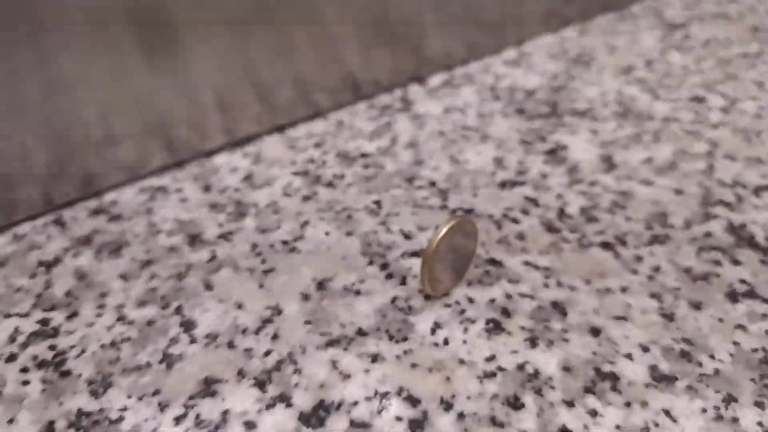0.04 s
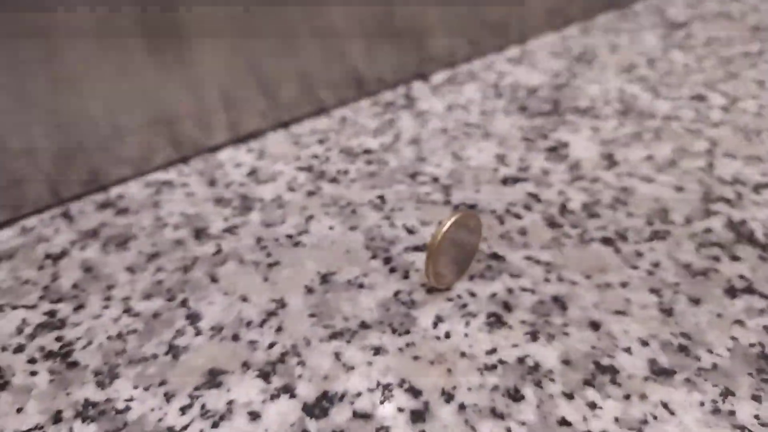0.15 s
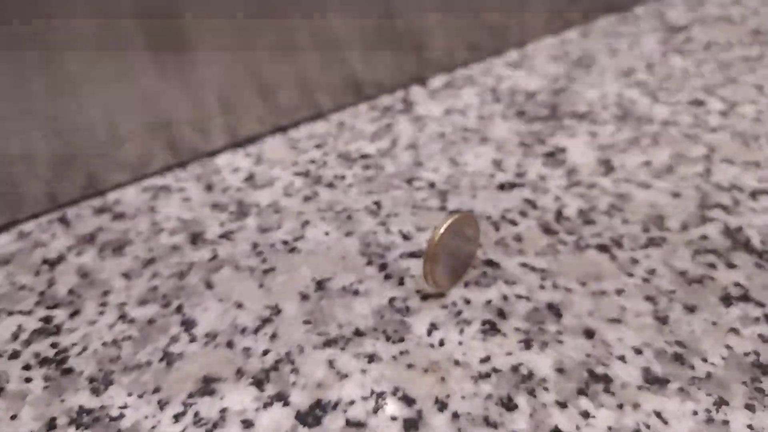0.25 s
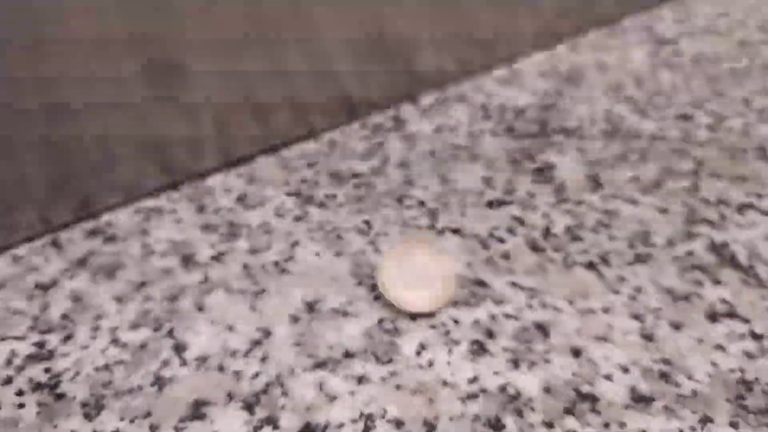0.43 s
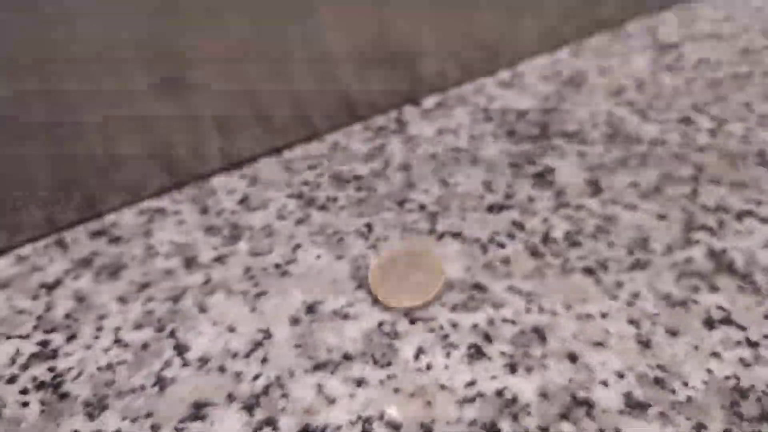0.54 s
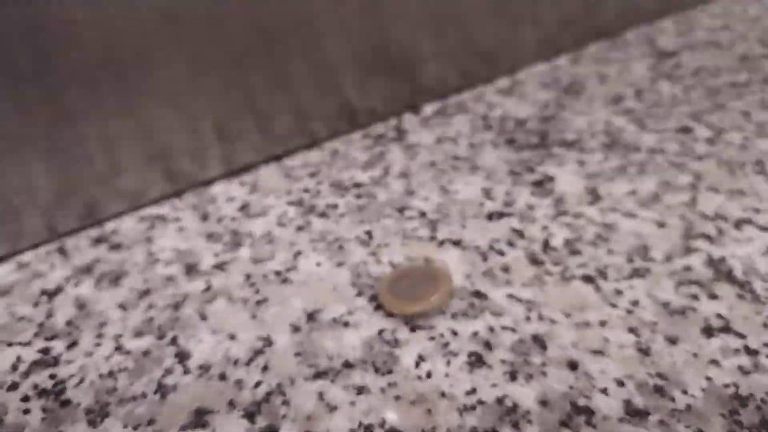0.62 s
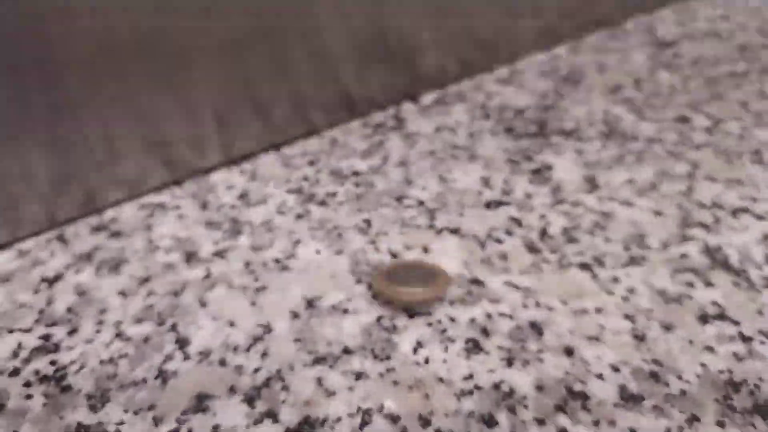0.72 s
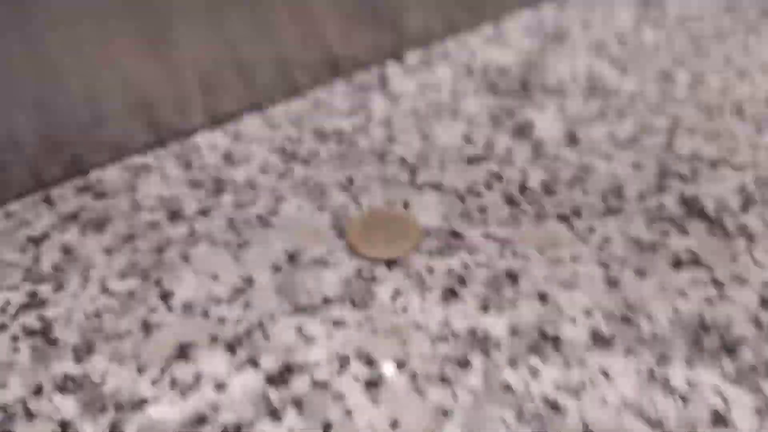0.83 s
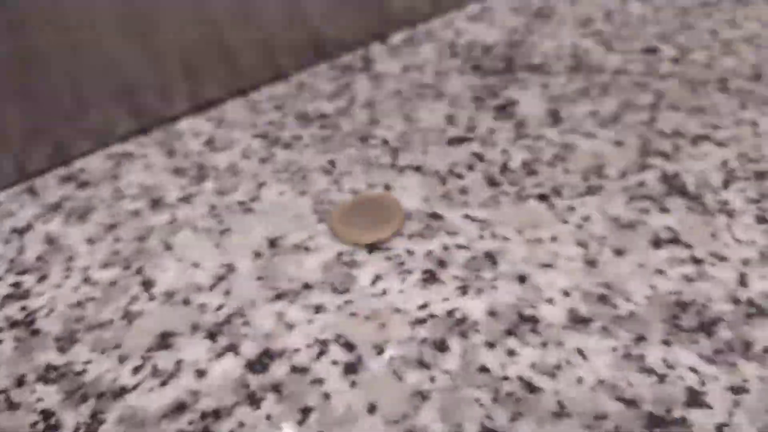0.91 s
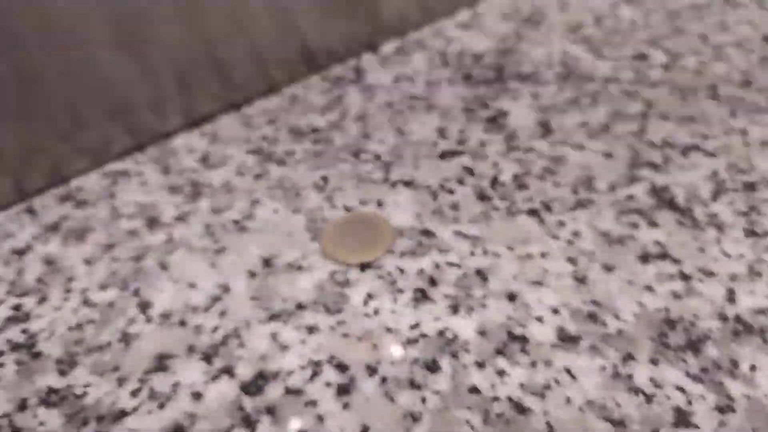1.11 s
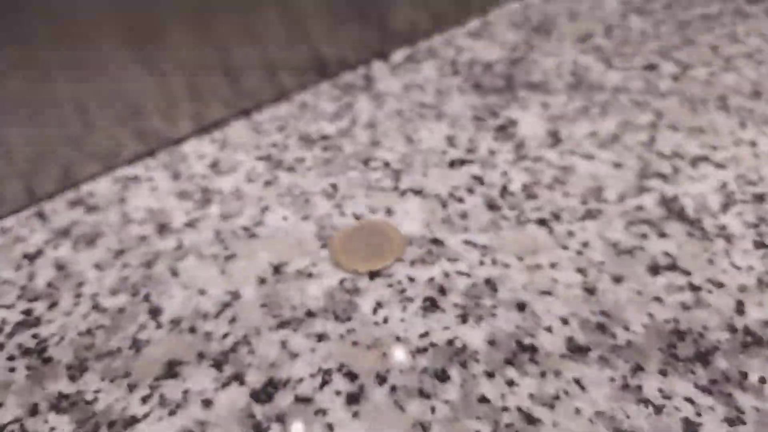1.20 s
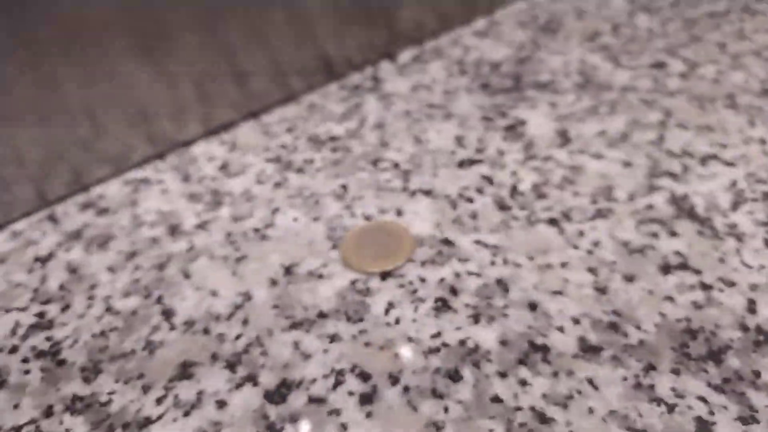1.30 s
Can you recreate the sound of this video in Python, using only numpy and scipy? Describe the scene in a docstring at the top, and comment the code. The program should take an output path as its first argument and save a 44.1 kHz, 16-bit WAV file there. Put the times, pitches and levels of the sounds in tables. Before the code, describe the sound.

Close by, a coin rattles down onto a stone counter with bright, ringing clinks that speed up and stop. Starting slightly earlier, a distant door bumps and shuts, then knocks twice more, booming through the room over a low rumble.

```python
"""A coin tips over on a stone counter, close to a stereo microphone: its rim clinks and scrapes
round in quickening turns, the metal rings, and it shudders to rest. Further off in the echoing
room, starting just ahead of the coin, something heavy, probably a door, pushes air, bumps, rasps
its latch and bangs shut; two lighter knocks follow. Each knock sets door and hall booming.
A low rumble and a faint hum lie under it all."""
import sys
import numpy as np
from scipy import signal
from scipy.fft import rfft, irfft
from scipy.io import wavfile
from scipy.ndimage import uniform_filter1d

SR = 44100
rng = np.random.default_rng(int(sys.argv[2]) if len(sys.argv) > 2 else 0)


def master(y):
    """Save y as 16-bit WAV."""
    cut = np.clip(np.atleast_2d(y).T, -1, 1)
    pcm = np.round(cut * 32767)  # scale
    wavfile.write(sys.argv[1], SR, pcm.astype(np.int16))


N = 59535
T, HZ = np.arange(N) / SR, np.fft.rfftfreq(N, 1 / SR)

# the hall's sound at the microphone (frequency [Hz], left-right correlation [-1 to 1])
HALL_CORRELATION = [(40, .98), (150, 0.85), (330, 0.73), (700, 0.053), (1400, -0.19), (3000, 0.21),
                    (16000, -0.15)]
# its balance (frequency [Hz], left over right [dB])
HALL_PAN = [(40, -3), (160, 1), (300, -1), (600, 0.5), (2000, 2.4), (5000, -1), (9000, -0.5), (14000, 3)]
# its decay (frequency [Hz], time to fall 60 dB [s])
HALL_T60 = [(40, 4.1), (160, 2.32), (400, 1.39), (1000, 1), (2000, 1.08), (5000, 0.83), (9000, 0.83),
            (15000, 1.14)]
# its build-up (frequency [Hz], time constant [s])
HALL_RISE = [(40, .03), (170, 0.034), (400, 0.006), (900, 0.0026), (1800, 0.0011), (9000, 0.00037)]
# spectra of room tone and pushed air (frequency [Hz], relative level [dB])
ROOM_TONE_COLOUR = [(5, -37), (25, 14), (60, 7.5), (170, -19), (280, -6.5), (1000, -23), (3000, -30.5),
                    (6000, -35), (9000, -27.5), (12000, -42), (16000, -42)]
DRAUGHT_COLOUR = [(8, -6.5), (30, 5.5), (60, -22), (90, -5.5), (150, -30), (500, -60)]
# swell of the air pushed by the door (time [s], level [dB])
DRAUGHT_SWELL = [(0, -46), (.12, -49), (.24, -29.5), (.33, -39), (.42, -51), (.55, -34), (.7, -51),
                 (1.35, -50)]
# far door knocks (time [s], gain [dB], bass below 200 Hz [dB], treble at 1.5 kHz [dB],
# crack gain [dB], decay time [factor])
DOOR_KNOCKS = [(0.084, -32, 1.5, -73, -30, 1), (.204, -17, 5, -26.5, -26, 0.43),
               (.232, -9, 1.5, -27, -25, 0.54), (.333, -2.5, -3, -1.5, 0.5, 0.98),
               (.378, -5, 2.5, -6, -18, 0.62), (0.446, -11, 3.5, -2, 0, 0.31), (.53, -17, -11, 0, -5, 0.77),
               (.892, -15, -8, -3.5, -3.5, 0.63), (1.053, -19, -6.5, -4, -4, 0.47)]
# spectra of a knock's reverberation, its crack and the latch as heard through the microphone
# (frequency [Hz], relative level [dB])
DOOR_COLOUR = [(8, -37), (28, -10), (58, -19.5), (90, -11), (170, 1.5), (250, 1), (400, -6), (650, -4.5),
               (1200, -12.5), (1900, -12.5), (3000, -18.5), (6000, -23), (8600, -17.5), (11000, -32),
               (14500, -44.5), (16000, -95)]
CRACK_COLOUR = [(200, -16.5), (850, -7.5), (1400, 21), (2000, 40), (2600, -14), (4000, -16), (8600, 25.5),
                (12000, -31), (16000, -50.5)]
LATCH_COLOUR = [(500, 5), (1800, -8.5), (5500, -20), (8000, -6), (9800, -3), (11000, -14), (12300, -12),
                (14500, -29), (16000, -55)]
# modes of door and hall, a list each (pitch [Hz], relative level [dB], base time to fall 60 dB [s])
BOOM_HZ = [88, 160, 210, 250, 306, 370, 554, 661, 713, 820, 1814, 2053]
BOOM_DB = [-24.5, -17, -21.5, -19.5, -29, -31.5, -26, -22, -29, -23.5, -38.5, -48]
BOOM_T60 = [3.3, 2.37, 2.5, 2.46, 3.1, 1.62, 1.55, 1.41, 1.05, 0.79, 1.4, 1.9]
# close rim strikes (time [s], gain [dB], chatter length [s], chatter gain [dB],
# left over right [dB], ring gain [dB], stone knock gain [dB])
RIM_STRIKES = [(0.5489, 2.5, .0014, 7, -2, -5, -7), (0.6397, 0.5, 0.0045, 9, -3.5, -8, -10),
               (0.7206, 1.5, 0.0062, 13, -8.5, -3, -6.5), (0.7923, -0.5, 0.0049, 18, -5.5, -10, -14),
               (0.858, -1, 0.0072, 12, -8, -1.5, -12), (0.9676, -6, .0062, 5, -6.5, -12, -13),
               (1.014, -10.5, 0.0067, 2, -9, -1, -25), (1.0495, -5.5, 0.0059, 6, -5.5, -2.5, -16),
               (1.081, -12.5, 0.0034, 33, -13, -14, -18), (1.1, -19, .003, 14, -1, -17, -25)]
# spectra of the rim's tick and the counter's knock as heard through the microphone,
# the tick bright near 9 kHz (frequency [Hz], relative level [dB])
TICK_AT_MIC = [(300, -32), (1300, -20), (3000, -21), (6000, -12.5), (7600, -4), (8900, 4.5), (9600, 4.5),
               (10600, -8.5), (12500, -39), (13400, -13), (14100, -4.5), (14600, -9), (15400, -13),
               (16000, -37), (16800, -44)]
STONE_AT_MIC = [(150, 13), (700, 5), (1400, 8.5), (2500, 3), (4500, -5), (7000, 3.5), (12000, -27)]
# the coin's modes, a list each
# (pitch [Hz], relative level [dB], time to fall 60 dB [s], waver [share of pitch])
COIN_HZ = [8662, 8882, 9211, 9415, 9539, 13980, 14130]
COIN_DB = [-44, -43, -49, -43, -49, -31, -34]
COIN_T60 = [.25, .35, .25, .35, .3, .17, .16]
COIN_WAVER = [.001, .0005, .0008, .0005, .0006, .0015, .0025]
# scrape of the rolling rim (time [s], relative level [dB])
SCRAPE_SWELL = [(.54, -56), (.57, -43), (.68, -44), (.75, -38), (0.828, -62), (0.922, -30), (.99, -60),
                (1.091, -35.5), (1.13, -51), (1.192, -56)]
# reverberation round the counter (frequency [Hz], time to fall 60 dB [s])
COIN_ROOM_T60 = [(500, 0.31), (4000, 0.37), (9000, 0.35), (15000, 0.18)]
# added balance of the whole coin sound (frequency [Hz], left over right [dB])
COIN_PAN = [(6000, 3.5), (9000, 1), (11500, -1), (14000, 10)]


def amp(db):
    """Decibels to gain."""
    return 10 ** (np.asarray(db) / 20)


def unit(x):
    """Scales to rms 1."""
    return x / np.sqrt(np.mean(x ** 2) + 1e-20)


def read(points, hz):
    """Reads a table on a log-frequency axis."""
    frequencies, values = np.transpose(points)
    return np.interp(np.log(hz + 1), np.log(frequencies + 1), values)


def pan(db):
    """Left and right gains for a level difference."""
    return amp(np.array([db, -db]).reshape(2, -1) / 2)


def add(mix, start_s, sound):
    """Mixes a sound in at the given time."""
    part = mix[:, round(start_s * SR):][:, :sound.shape[-1]]
    part += sound[..., :part.shape[1]]


def convolve(x, response):
    """Plays sound through a response, channel by channel."""
    return signal.fftconvolve(np.atleast_2d(x), np.atleast_2d(response), axes=1)[:, :N]


def click(colour):
    """Minimum-phase click of energy 1 with the given spectrum."""
    log_gain = np.log(amp(read(colour, abs(np.fft.fftfreq(2048, 1 / SR)))))
    pulse = np.fft.ifft(np.exp(np.conj(signal.hilbert(log_gain)))).real
    return pulse / np.linalg.norm(pulse)


def diffuse(colour):
    """Noise reaching the microphone from all round, alike on both sides only in the bass."""
    left, unrelated = rfft(rng.standard_normal((2, N)))
    correlation = read(HALL_CORRELATION, HZ)
    right = correlation * left + np.sqrt(1 - correlation ** 2) * unrelated
    gains = amp(read(colour, HZ)) * pan(read(HALL_PAN, HZ))
    return unit(irfft(np.array([left, right]) * gains, N))


def die_away(noise, t60, rise, bands=16):
    """Reverberation: each band builds up and dies at its own speed."""
    centres, spectrum = np.geomspace(30, 16000, bands), rfft(noise)
    out = np.zeros_like(noise)
    for hz, weights in zip(centres, np.eye(bands)):
        band = irfft(spectrum * read(list(zip(centres, weights)), HZ), N)
        out += band * amp(-60 * T / read(t60, hz)) * (1 - np.exp(-T / read(rise, hz)))
    return out


def wavering(hz, depth, drift_s):
    """Phase of a tone whose pitch strays by the share depth, changing over drift_s."""
    stray = unit(uniform_filter1d(rng.standard_normal(N), round(drift_s * SR)))
    return 2 * np.pi * (np.cumsum(hz * (1 + depth * stray)) / SR + rng.random())


def room_tone(hum_hz=154.3):
    """Low rumble all round the microphone and a faint hum in the centre."""
    return amp(-47.5) * diffuse(ROOM_TONE_COLOUR) + amp(-47) * np.sin(2 * np.pi * hum_hz * T)


def draught():
    """A low rumble of air swells as the door swings and shuts."""
    return diffuse(DRAUGHT_COLOUR) * amp(np.interp(T, *np.transpose(DRAUGHT_SWELL)))


def boom(decay_factor, rise_s=0.035):
    """Resonances of door and hall build up after a knock and ring on as dying sines."""
    modes = sum(amp(db - 60 * T / (t60 * decay_factor)) * np.sin(2 * np.pi * (hz * T + rng.random()))
                for hz, db, t60 in zip(BOOM_HZ, BOOM_DB, BOOM_T60))
    return modes * (1 - np.exp(-T / rise_s))


def door(crack_rise_s=0.00064, crack_decay_s=0.0069):
    """Knocks from across the hall: a short crack, then the room fills, the bass last, and booms on."""
    out = np.zeros((2, N))
    crack_envelope = np.exp(-T / crack_decay_s) * (1 - np.exp(-T / crack_rise_s))
    for start_s, db, bass_db, treble_db, crack_db, decay_factor in DOOR_KNOCKS:
        decay = [(hz, t60 * decay_factor) for hz, t60 in HALL_T60]
        wash = amp(-8.5) * die_away(diffuse(DOOR_COLOUR), decay, HALL_RISE)
        crack = amp(crack_db - 6) * diffuse(CRACK_COLOUR) * crack_envelope
        knock = wash + crack + boom(decay_factor)
        tone = [(200, bass_db), (330, 0), (500, 0.037), (1500, treble_db), (6000, 1.19 * treble_db)]
        add(out, start_s, amp(db) * irfft(rfft(knock) * amp(read(tone, HZ)), N))
    return out


def latch(rasp_start_s=.256, squeak_start_s=.277, shut_s=.335, fade_s=0.0027):
    """The far latch rasps over its plate with a thin squeak until the door shuts."""
    def held(start_s):
        return np.clip((T - start_s) / fade_s, 0, 1) * np.exp(-np.maximum(T - shut_s, 0) / fade_s)
    phase = wavering(hz=9775, depth=.001, drift_s=.005)
    squeak = amp(-38.5) * pan(-2) * np.sin([phase, phase - 1.8])  # the right side lags
    rasp = amp(-37.5) * diffuse(LATCH_COLOUR)
    return rasp * held(rasp_start_s) + squeak * held(squeak_start_s)


def rim_scrape(grains_per_s=1200):
    """The rolling rim ticks over the grain of the stone, close to the microphone."""
    grains = rng.choice([-1, 1], N) * (rng.random(N) < grains_per_s / SR)
    strengths = amp(-3 * np.minimum(rng.exponential(1, N), 3))
    times, levels_db = np.transpose(SCRAPE_SWELL)
    swell = amp(np.interp(T, times, levels_db)) * (T > times[0]) * (T < times[-1])
    return pan(-2.5) * convolve(unit(grains * strengths) * swell, click(TICK_AT_MIC))


def rim_chatter(length_s, db, touches_per_s=7000, skew=0.77):
    """One impact of rim on stone, then a brief flurry of touches."""
    touches = rng.standard_normal(N) * (rng.random(N) < touches_per_s / SR)
    touches *= (T < length_s) * np.sin(np.pi * np.minimum(T / length_s, 1) ** skew)
    touches *= amp(db) / (np.linalg.norm(touches) + 1e-9)
    touches[0] = 1
    return touches


def coin_ring():
    """The coin's modes waver as the point of contact runs round the rim, the highest most."""
    return sum(amp(db - 60 * T / t60) * np.sin(wavering(hz, depth, drift_s=.006))
               for hz, db, t60, depth in zip(COIN_HZ, COIN_DB, COIN_T60, COIN_WAVER))


def rim_clinks(gain_db=4.5):
    """Each strike of the rim ticks, rings the coin and knocks on the counter."""
    rim_click, stone_click = click(TICK_AT_MIC), click(STONE_AT_MIC)
    out = np.zeros((2, N))
    for start_s, db, chatter_s, chatter_db, pan_db, ring_db, stone_db in RIM_STRIKES:
        touches = rim_chatter(chatter_s, chatter_db)
        tick, knock = convolve(touches, rim_click), convolve(touches, stone_click)
        ring = np.array([coin_ring() for channel in range(2)])
        metal = pan(pan_db) * (tick / np.linalg.norm(tick) + amp(ring_db) * ring)
        stone = amp(stone_db) * knock / np.linalg.norm(knock)
        add(out, start_s, amp(gain_db + db) * (metal + stone))
    return out


def coin(left_lag_s=0.000242, room_rise_s=0.0044, room_db=-2.5):
    """The close coin reaches the right side of the microphone first; a short reverberation follows."""
    direct = rim_clinks() + rim_scrape()
    direct[0] = irfft(rfft(direct[0]) * np.exp(-2j * np.pi * HZ * left_lag_s), N)
    room = die_away(rng.standard_normal((2, N)), COIN_ROOM_T60, [(1000, room_rise_s)])
    reverberation = amp(room_db) * convolve(direct, room / np.linalg.norm(room[0]))
    return irfft(rfft(direct + reverberation) * pan(read(COIN_PAN, HZ)), N)


def scene():
    """The coin up close, the door far behind it, the room all round."""
    return coin() + door() + latch() + draught() + room_tone()


def record(dry, knee=.6, ceiling=.92, cutoff_hz=16900):
    """The loudest peaks are softly rounded off, then the highest treble is cut."""
    below, headroom = np.clip(dry, -knee, knee), ceiling - knee
    rounded = below + headroom * np.tanh((dry - below) / headroom)
    lowpass = signal.firwin(511, cutoff_hz, window=("kaiser", 9), fs=SR)
    return signal.oaconvolve(rounded, lowpass[None], "same")


dry = scene()
out = record(dry)
master(out)
```